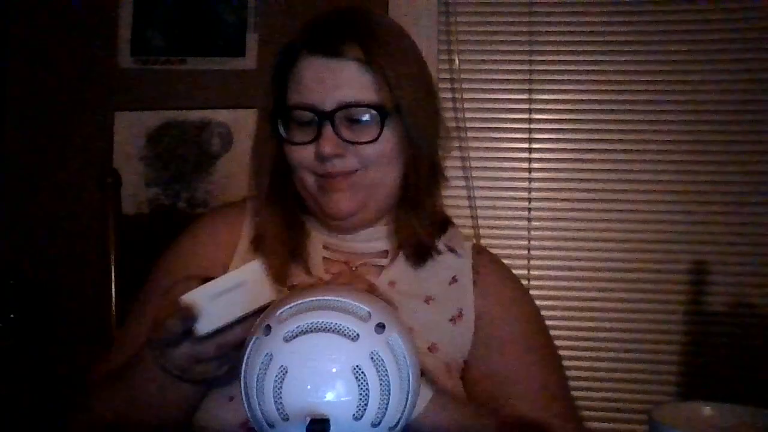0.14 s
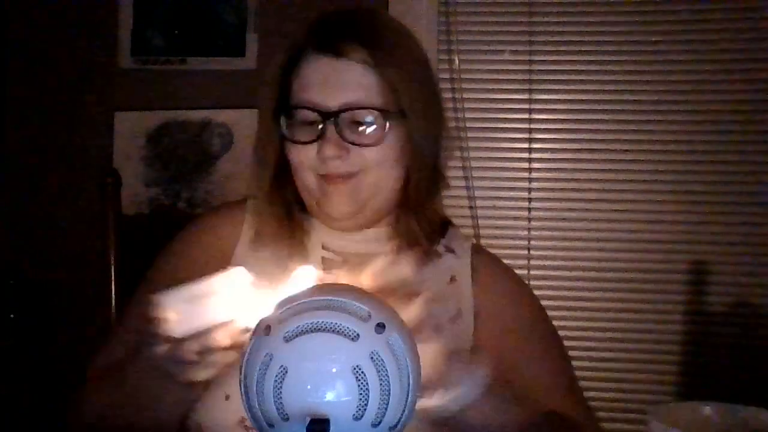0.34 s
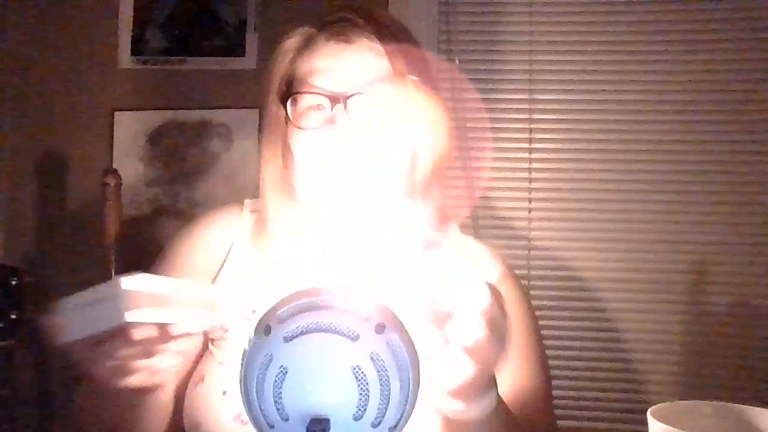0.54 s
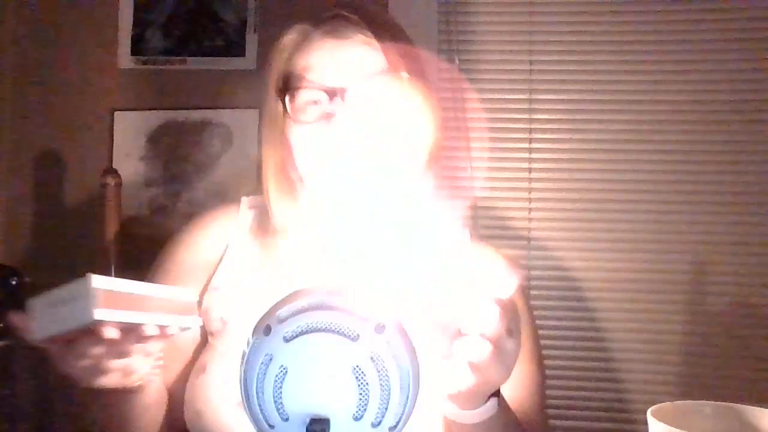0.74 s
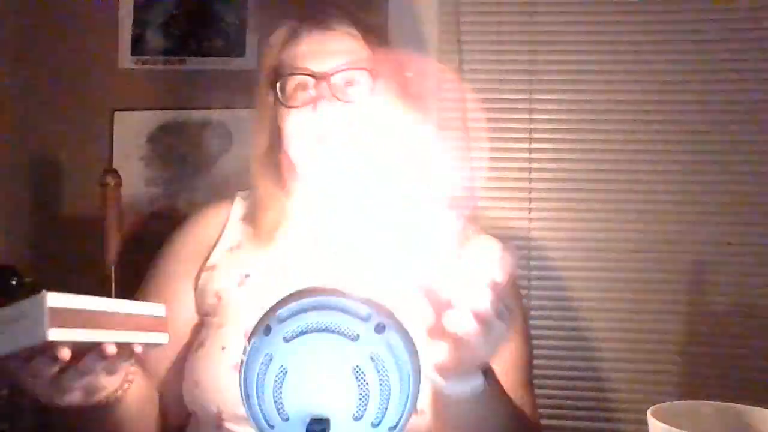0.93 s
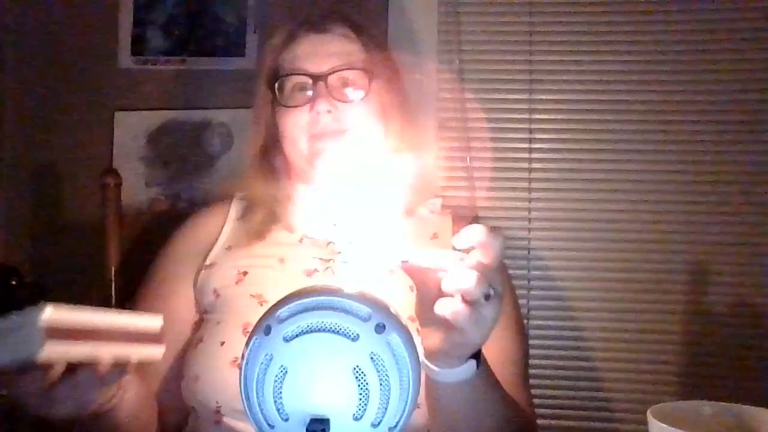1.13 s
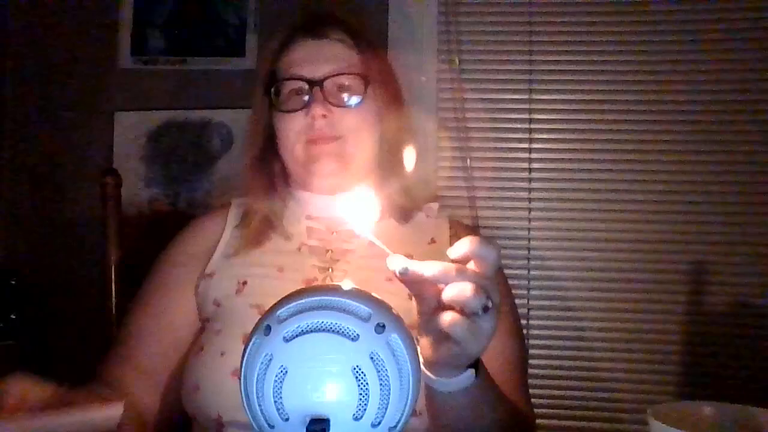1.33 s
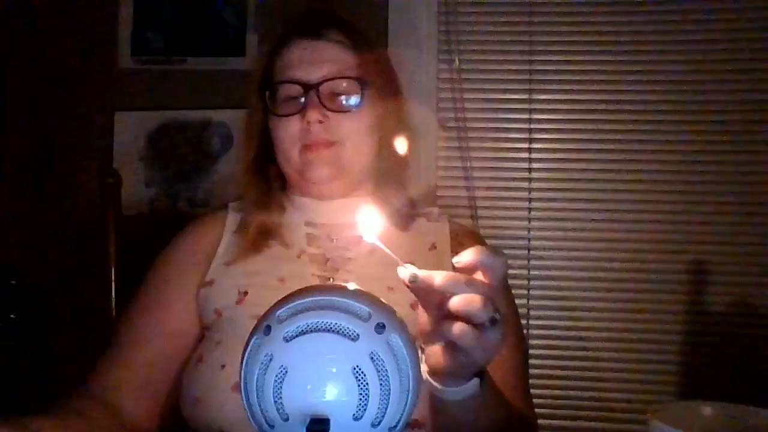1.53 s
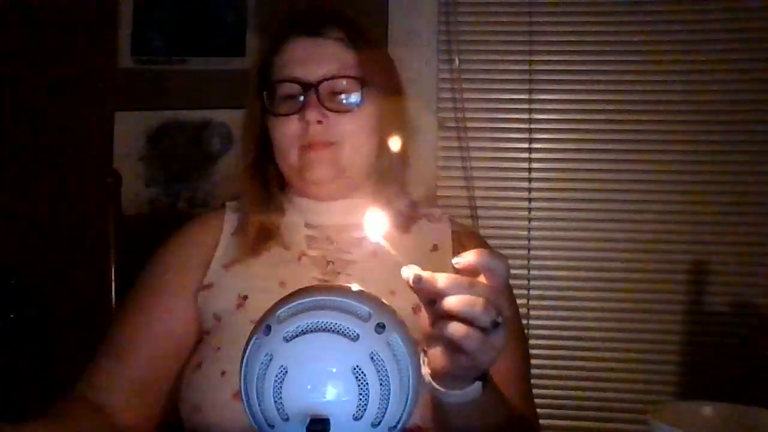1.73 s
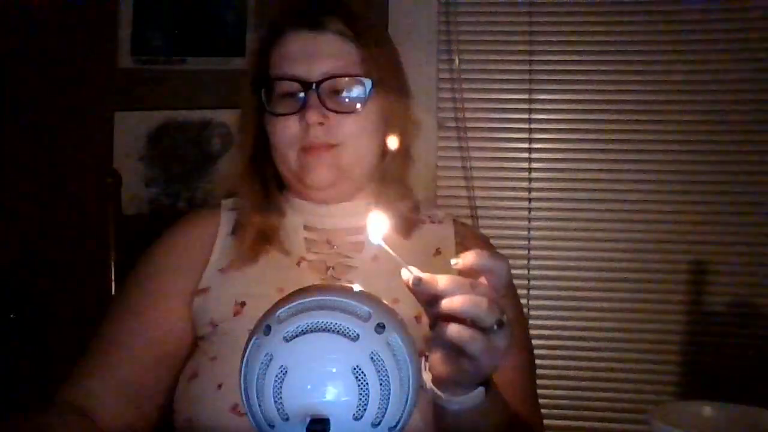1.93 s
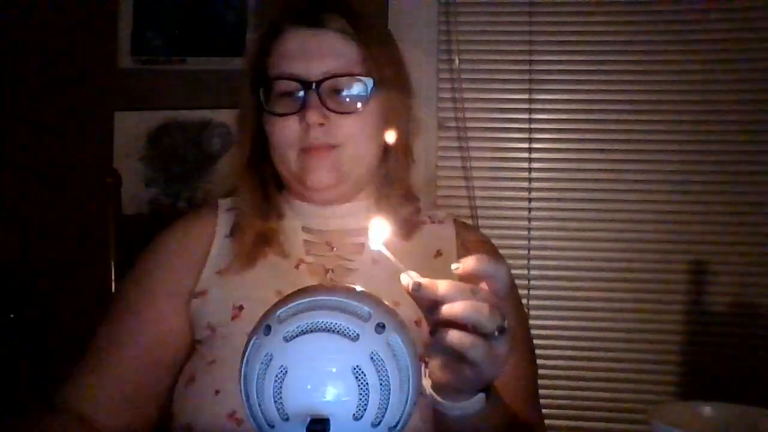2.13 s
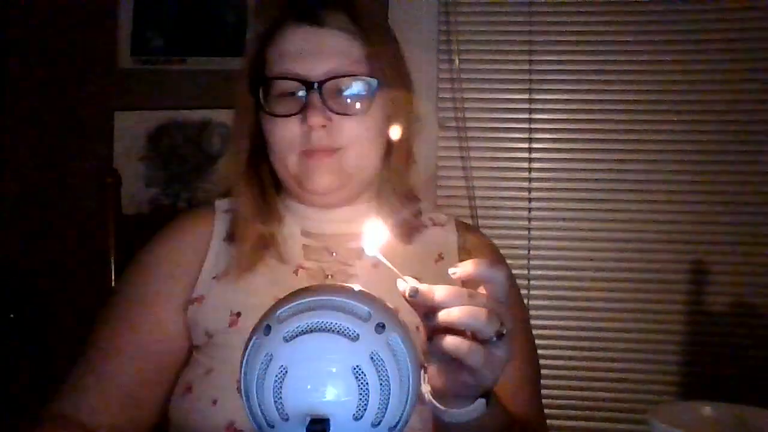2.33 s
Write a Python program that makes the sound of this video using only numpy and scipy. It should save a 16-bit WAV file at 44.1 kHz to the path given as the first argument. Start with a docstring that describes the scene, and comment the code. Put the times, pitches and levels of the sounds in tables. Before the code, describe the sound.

A wooden match scrapes alight and hisses, then the matchbox is set down softly.

```python
"""Over a faint mains hum, a wooden match is swiped along a matchbox, close to a desk microphone
in a small room. The head slips and scrapes, which makes the hollow box chatter.
It crackles alight with a puff of air, then fizzes and spits for half a second.
Last, the box is put down with a few light knocks, soft brushing and a low rumble from the desk."""
import sys
import numpy as np
from scipy import signal
from scipy.io import wavfile

SR = 44100
rng = np.random.default_rng(int(sys.argv[2]) if len(sys.argv) > 2 else 0)


def int16_out(signal):
    """Quantize to a 16-bit WAV file."""
    q = np.round(np.clip(np.atleast_2d(signal).T, -1, 1) * 32767)
    wavfile.write(sys.argv[1], SR, q.astype(np.int16))


N = 103635
T = np.arange(N) / SR


def amp(db):
    """Turns decibels into a number to multiply a sound by."""
    return 10 ** (np.asarray(db) / 20)


def unit(x):
    """Scales a sound so that its average strength (rms) is 1."""
    return x / np.sqrt(np.mean(x ** 2) + 1e-20)


def value_at(points, hz):
    """Looks up a pitch in a table, sliding smoothly between its rows."""
    pitches, values = np.transpose(points)
    return np.interp(np.log(hz + 1), np.log(pitches + 1), values)


def loudness(points):
    """A volume that follows rows of (time_s, level_db) and is silent outside them."""
    times, db = np.transpose(points)
    return amp(np.interp(T, times, db)) * (T >= times[0]) * (T <= times[-1])


def add(mix, start_s, sound):
    """Mixes a sound in at the given time."""
    part = mix[max(round(start_s * SR), 0):][:len(sound)]
    part += sound[:len(part)]


def colour(x, tone, size=8192):
    """Makes some pitches stronger than others; white noise keeps its overall level."""
    log_gain = np.log(amp(value_at(tone, abs(np.fft.fftfreq(size, 1 / SR)))))
    spectrum = np.exp(np.conj(signal.hilbert(log_gain)))  # no ringing ahead of a click
    taps = np.fft.ifft(spectrum).real[:size // 2]
    return signal.fftconvolve(x, taps / np.linalg.norm(taps))[:len(x)]


def flutter(rate_hz, depth_db):
    """A volume that wanders at random."""
    steps = rng.standard_normal(N)
    return amp(depth_db * np.interp(T * rate_hz, np.arange(N), steps))


def clicks(per_s, spread_db):
    """Tiny clicks of uneven size at random moments."""
    sizes = amp(spread_db * np.minimum(rng.exponential(1, N), 4))
    signs = rng.choice([-1., 1.], N)
    return unit(sizes * signs * (rng.random(N) < per_s / SR))


def ring(notes, rise_s):
    """A struck object's notes swell, then each drops 60 dB in its fade_s. The peak is 1."""
    t = T[:SR // 3]
    sound = sum(amp(db - 60 * t / fade_s) * np.sin(2 * np.pi * hz * t) for hz, db, fade_s in notes)
    sound = sound * (1 - np.exp(-(t / rise_s) ** 2))
    return sound / abs(sound).max()


# How long the room's echo lasts: pitch_hz, fade_s
ROOM_FADES = [(100, 0.25), (1000, 0.26), (4000, 0.18), (15000, 0.06)]
def room(x, echo_db, gap=22):
    """Adds many small echoes, about `gap` samples apart; high pitches die first."""
    echoes = np.zeros(SR // 2)
    at = np.arange(gap * 8, len(echoes) - gap, gap)
    echoes[at + rng.integers(0, gap, len(at))] = rng.choice([-1., 1.], len(at))
    hz, t, bands = signal.stft(echoes, SR, nperseg=256)
    fade = amp(-60 * t / value_at(ROOM_FADES, hz)[:, None])
    tail = signal.istft(bands * fade, SR, nperseg=256)[1]
    return x + amp(echo_db) * signal.fftconvolve(x, tail / np.linalg.norm(tail))[:N]


# The notes of the mains hum: pitch_hz, level_db
HUM_NOTES = [(59.0, -56.5), (118.2, -68.5), (177.6, -83.5), (241, -76.5)]
# The tone of the room noise: pitch_hz, boost_db
NOISE_TONE = [(20, 20.5), (60, 11.5), (130, 7), (250, 1.5), (450, -4), (800, -6.5), (1250, -6),
              (1800, -15.5), (2600, -18), (3200, -22.5), (4700, -20.5), (5600, -25), (7200, -19.5),
              (8600, -21), (10400, -22.5), (11300, -25), (12200, -24), (15500, -24)]
# The room noise creeps up, then settles: time_s, boost_db
NOISE_CURVE = [(0, -16), (.17, 3.5), (.9, 0), (2.4, 0.5)]
def background(noise_db=-64):
    """Steady mains hum over quiet room noise."""
    hum = sum(amp(db) * unit(np.sin(2 * np.pi * (hz * T + rng.random()))) for hz, db in HUM_NOTES)
    noise = colour(rng.standard_normal(N), NOISE_TONE) * flutter(rate_hz=15, depth_db=3.0)
    return hum + amp(noise_db) * loudness(NOISE_CURVE) * noise


# The tone of taking hold of the box: pitch_hz, boost_db
GRIP_TONE = [(100, -12), (450, -4), (850, 1.5), (1400, -4.5), (2500, -15.5), (4500, -21.5), (8000, -30.5),
             (15500, -50)]
# Soft brushes of hand and box: middle_s, width_s, level_db
BRUSH_STROKES = [(1.138, 0.014, -77), (1.345, 0.019, -74.5), (1.44, .022, -75.5), (1.51, 0.019, -75),
                 (1.897, 0.036, -61.5), (1.988, 0.014, -71), (2.058, 0.019, -62), (2.13, 0.024, -78),
                 (2.187, 0.017, -68), (2.27, .03, -72.5)]
# The tone of a touch on the box, also used for knocks: pitch_hz, boost_db
TOUCH_TONE = [(100, 4.5), (700, 5), (1300, 8.5), (1750, -1.5), (2100, 3.5), (2600, -2.5), (3400, -2.5),
              (5400, -7.5), (8200, -5.5), (10500, -14), (15500, -17)]
# The tone of the desk stirred by the arm: pitch_hz, boost_db
RUMBLE_TONE = [(5, -17.5), (14, 2), (26, -0.5), (45, -12), (130, -31), (220, -37), (600, -57.5),
               (3000, -101)]
def handling(grip_db=-56.5, fade_db_per_s=113.5, rumble_db=-49.5, rumble_start_s=1.84):
    """The box shifts in the hand at first; later the hand brushes it and the arm stirs the desk."""
    grip = colour(rng.standard_normal(N) * amp(grip_db - fade_db_per_s * T), GRIP_TONE)
    pressure = sum(amp(db) * np.exp(-((T - middle_s) / width_s) ** 2 / 2)
                   for middle_s, width_s, db in BRUSH_STROKES)
    brush = colour(clicks(per_s=3100, spread_db=2.5) * pressure, TOUCH_TONE)
    fade_in = np.clip((T - rumble_start_s) / .03, 0, 1)
    rumble = amp(rumble_db) * fade_in * unit(colour(rng.standard_normal(N), RUMBLE_TONE))
    return grip + room(brush, echo_db=-13.5) + rumble


# Box and hand knock on the desk: start_s, level_db, pitch_hz, fade_s, tick_boost_db
BOX_KNOCKS = [(1.222, -62.5, 1079, 0.032, -25), (1.2876, -43.5, 1087, 0.016, -19),
              (1.2908, -41, 943, 0.013, -9.5), (1.3455, -52.5, 1126, .018, -9.5),
              (1.4922, -54.5, 780, 0.017, -3.5), (1.4979, -51, 1050, 0.012, -9),
              (1.508, -58, 944, 0.038, -13), (1.515, -53.5, 1120, 0.011, -11.5),
              (1.7426, -43.5, 1110, 0.0095, -31.5), (1.7958, -44.5, 1233, 0.014, -9.5),
              (1.7988, -43.5, 1059, 0.012, -10)]
# Weight lands on the desk: start_s, level_db
DESK_THUMPS = [(1.799, -34), (1.820, -41.5), (1.929, -52.5), (1.954, -46)]
# The notes the desk rings with: pitch_hz, boost_db, fade_s
DESK_NOTES = [(61.6, 9.5, 0.15), (118.5, 19.5, 0.048), (197, 4.5, 0.042), (403, -21, 0.08),
              (660, -24, 0.031)]
def knocks():
    """Each knock is a tick and a short cardboard ring; weight landing makes the desk thump."""
    taps, thumps, t = np.zeros(N), np.zeros(N), T[:SR // 3]
    for start_s, db, hz, fade_s, tick_boost_db in BOX_KNOCKS:
        notes = [(hz * 0.691, -8, fade_s), (hz, 0, fade_s), (hz * 1.17, -5, fade_s)]
        cardboard = ring(notes, rise_s=0.0013)
        tick = colour(rng.standard_normal(len(t)) * np.exp(-t / 0.0031), TOUCH_TONE)
        add(taps, start_s, amp(db) * (cardboard + amp(tick_boost_db) * tick))
    for start_s, db in DESK_THUMPS:
        add(thumps, start_s, amp(db) * ring(DESK_NOTES, rise_s=0.0052))
    return room(taps, echo_db=-13) + thumps


# The head's first burst of flame: time_s, level_db
BURST_CURVE = [(.232, -61), (.246, -28), (.266, -35), (.276, -38.5), (.288, -34.5), (.296, -42),
               (.304, -51), (.335, -72), (.375, -81), (.43, -70)]
# The head burning steadily: time_s, level_db
FIZZ_CURVE = [(.25, -57), (.31, -46.5), (.35, -50.5), (.385, -57), (.44, -59), (.49, -56.5), (.57, -57.5),
              (.70, -56), (.79, -57), (.815, -61), (.84, -58), (.865, -62.5), (.91, -65.5), (.935, -86),
              (.97, -100)]
# Small pops in the flame: start_s, level_db
FLAME_POPS = [(0.48, -59), (.556, -55.5), (.695, -46), (0.733, -54), (.848, -58), (.909, -55.5)]
# The tones of the burst, the fizz and the pops: pitch_hz, boost_db
BURST_TONE = [(40, -6), (170, 3), (450, -7), (800, -1), (1200, 4), (1800, -7), (2600, -0.5), (3500, -2.5),
              (4900, -0.5), (5400, -4), (6400, -4.5), (7300, 1), (8400, 2), (8900, -4.5), (9800, -1),
              (10900, -6.5), (12200, -2.5), (13600, -3), (14400, -4.5), (15600, -8)]
FIZZ_TONE = [(40, -0.5), (200, 6.5), (480, -2), (800, 1), (1300, 5), (1850, -10.5), (2200, -3),
             (2400, -5.5), (2700, 2.5), (3130, -10), (3450, -2), (4200, -4), (4480, -8), (4750, -0.5),
             (5280, -12), (6100, -4.5), (6600, -4), (7050, 2), (7550, -5.5), (7900, -1.5), (8600, -2),
             (9600, -7), (9900, -4.5), (10480, -15.5), (10900, -5), (11450, -2.5), (12000, -18),
             (12600, -6.5), (13800, -11), (14600, -12.5), (15050, -8), (15900, -14.5)]
POP_TONE = [(100, -7), (600, 2), (1200, 7.5), (1800, -0.5), (2700, 0.5), (4000, -9), (8000, -8),
            (15500, -14)]
# Air pushed out by the flame: start_s, level_db, pitch_hz, fade_s
AIR_PUFFS = [(0.235, -29.5, 62, 0.072), (.243, -28, 13, 0.32)]
def flame():
    """The head bursts alight and pushes air at the microphone, then fizzes and spits until spent."""
    crackle = unit(rng.standard_normal(N) + amp(-3.5) * clicks(per_s=4000, spread_db=2.5))
    burst = colour(crackle * loudness(BURST_CURVE), BURST_TONE)
    gas = unit(rng.standard_normal(N) + amp(-5.5) * clicks(per_s=3000, spread_db=4.0))
    flow = flutter(rate_hz=45, depth_db=1.5) * loudness(FIZZ_CURVE)
    fizz = colour(gas * flow, FIZZ_TONE)
    spurts, air = np.zeros(N), np.zeros(N)
    for start_s, db in FLAME_POPS:
        add(spurts, start_s, amp(db) * np.exp(-T[:SR // 20] / 0.0013))
    pops = colour(gas * spurts, POP_TONE)
    for start_s, db, hz, fade_s in AIR_PUFFS:
        add(air, start_s, -amp(db) * ring([(hz, 0, fade_s)], rise_s=.002))
    return room(burst + fizz + pops, echo_db=-18) + air


# The match head catches on the striking strip: start_s, level_db
HEAD_SLIPS = [(0.2025, -31), (0.21, -24), (0.2115, -20), (0.217, -23), (0.2195, -19), (0.2341, -25),
              (.2400, -19), (.2560, -23)]
# The notes the hollow box rings with: pitch_hz, boost_db, fade_s
BOX_NOTES = [(1100, -5.5, .016), (1222, -2.5, 0.015), (1431, -6.5, 0.01158), (2350, -21.5, .01)]
# How loudly the head rubs along the strip: time_s, level_db
SCRAPE_CURVE = [(.176, -88), (.183, -76), (.196, -60), (.206, -54), (.215, -40.5), (.2213, -41.5),
                (.223, -25.5), (.2295, -21.5), (.2308, -14), (.2345, -20), (.237, -8), (.2402, -7.5),
                (.2445, -21), (.248, -38.5), (.262, -75.5)]
# The tone of that rubbing: pitch_hz, boost_db
SCRAPE_TONE = [(60, -22.5), (300, -11.5), (520, -15), (1150, -4), (1800, -15), (2200, -9), (3600, -11),
               (4250, -5), (4750, -1.5), (5300, -11), (6000, -6), (6600, -10.5), (7200, -2.5), (8500, -0.5),
               (9700, -4), (10450, -13.5), (11300, -1), (12500, -5.5), (13500, -3.5), (14800, -2.5),
               (15800, -17.5)]
def strike():
    """The head slips along the strip, ringing the box, and tears into thick crackle."""
    chatter = np.zeros(N)
    for start_s, db in HEAD_SLIPS:
        add(chatter, start_s, amp(db) * ring(BOX_NOTES, rise_s=0.0018))
    grit = unit(clicks(per_s=11000, spread_db=0.5) + amp(-3.5) * rng.standard_normal(N))
    scrape = colour(grit * loudness(SCRAPE_CURVE), SCRAPE_TONE)
    return room(chatter, echo_db=-17.5) + room(scrape, echo_db=-23)


def scene():
    """All the sounds meet at one microphone."""
    return (strike() + flame() + knocks() + handling() + background())[None]


def record(dry):
    """The recorder rounds off the loudest crackle, then cuts the very highest pitches."""
    ceiling, highest_hz = .8, 15800
    rounded = dry / (1 + (dry / ceiling) ** 6) ** (1 / 6)
    treble_cut = signal.firwin(511, highest_hz, window=("kaiser", 9), fs=SR)
    return signal.oaconvolve(rounded, treble_cut[None], "same")


dry = scene()
out = record(dry)
int16_out(out)
```